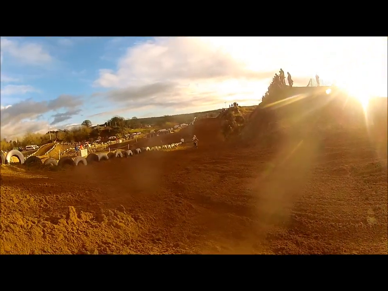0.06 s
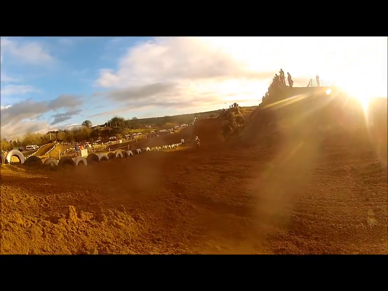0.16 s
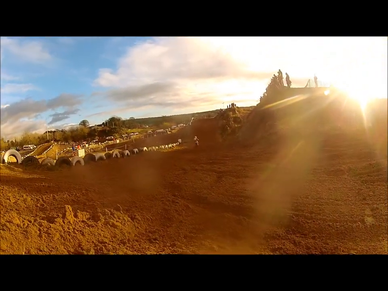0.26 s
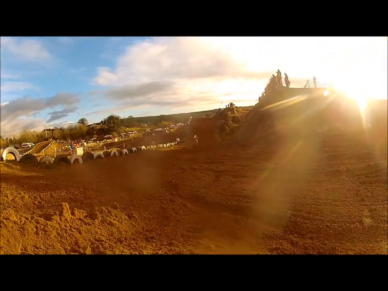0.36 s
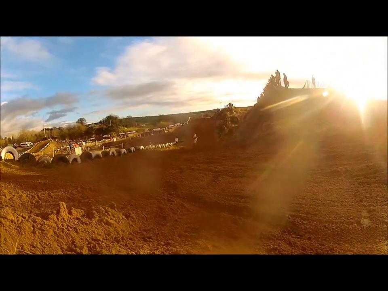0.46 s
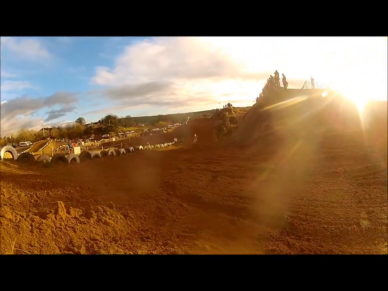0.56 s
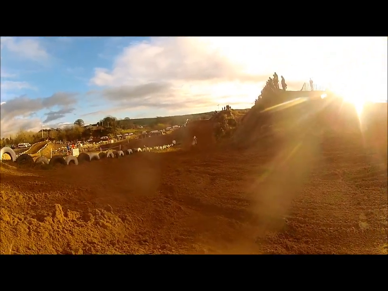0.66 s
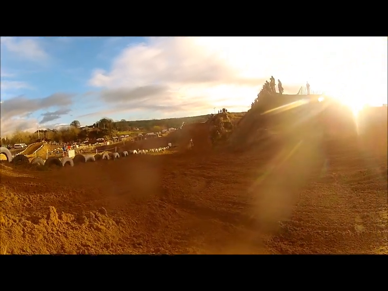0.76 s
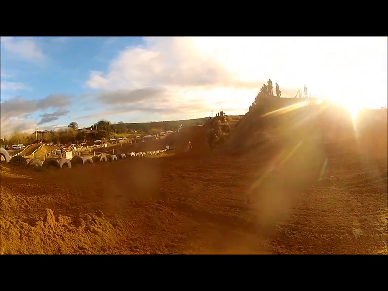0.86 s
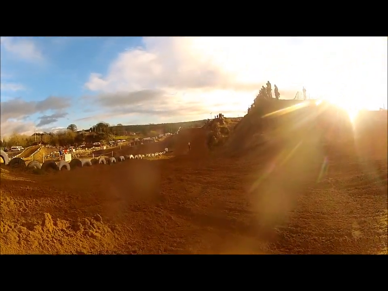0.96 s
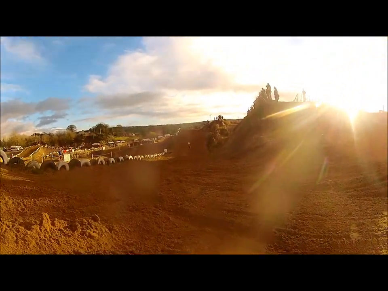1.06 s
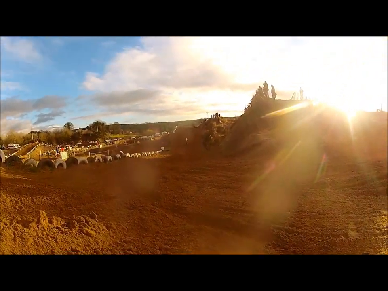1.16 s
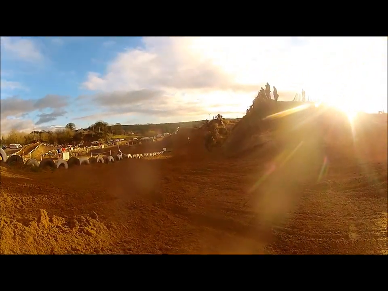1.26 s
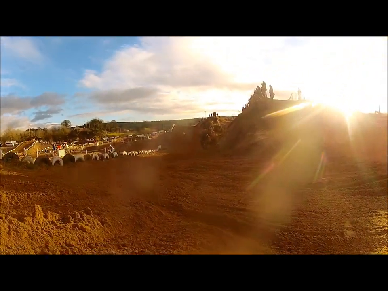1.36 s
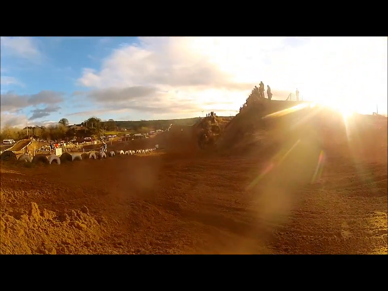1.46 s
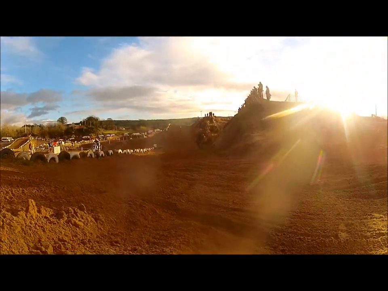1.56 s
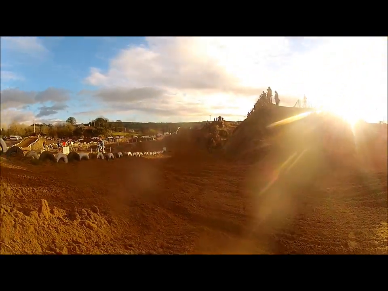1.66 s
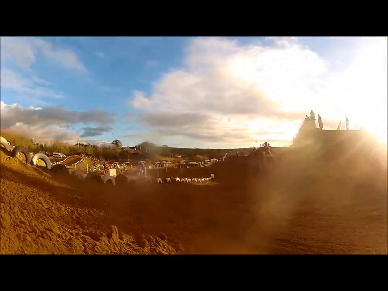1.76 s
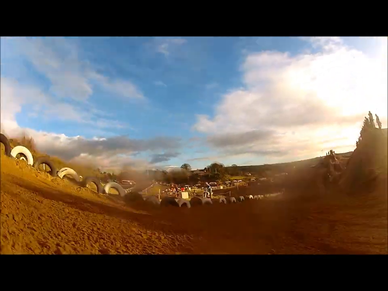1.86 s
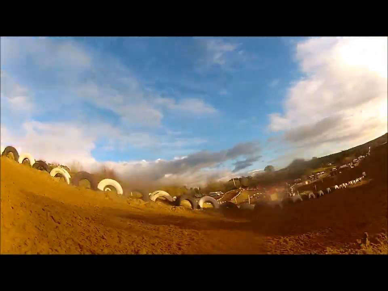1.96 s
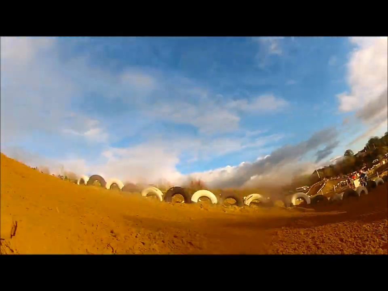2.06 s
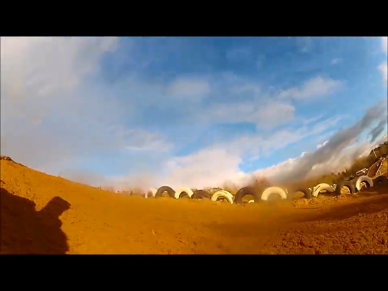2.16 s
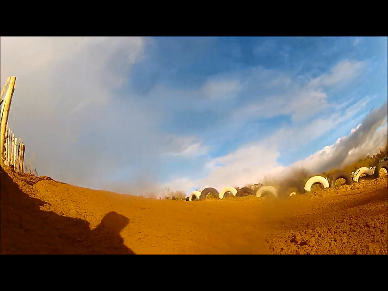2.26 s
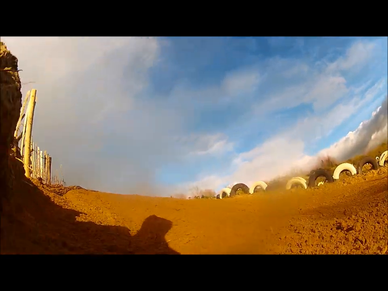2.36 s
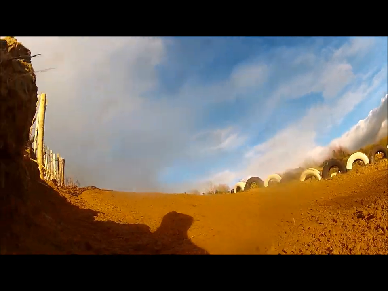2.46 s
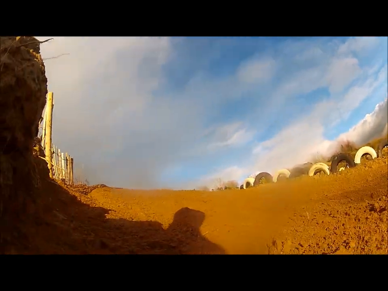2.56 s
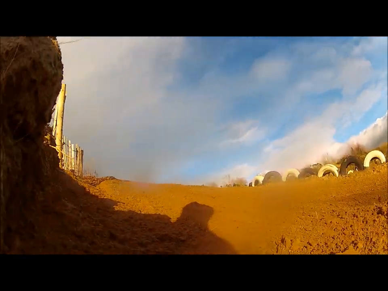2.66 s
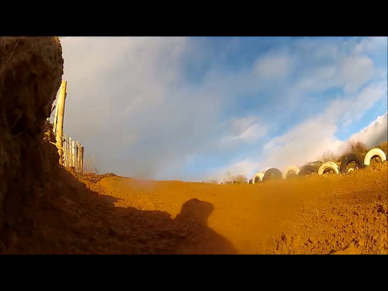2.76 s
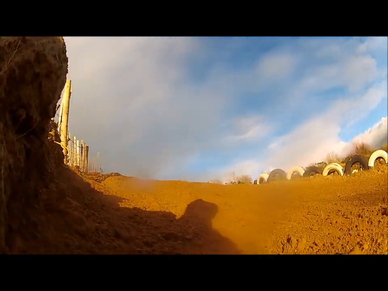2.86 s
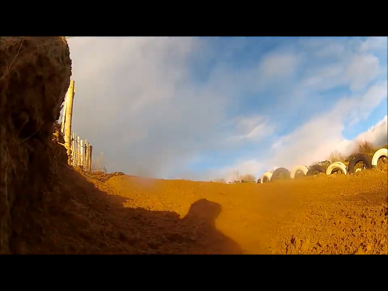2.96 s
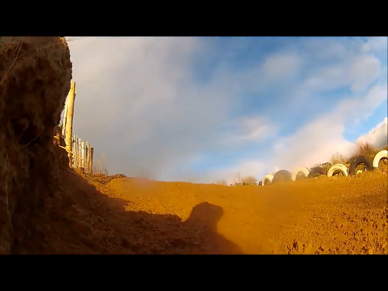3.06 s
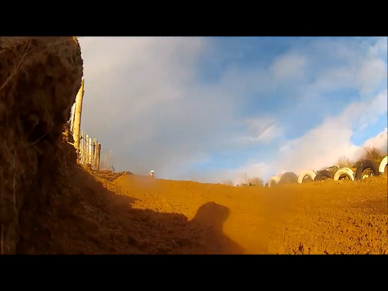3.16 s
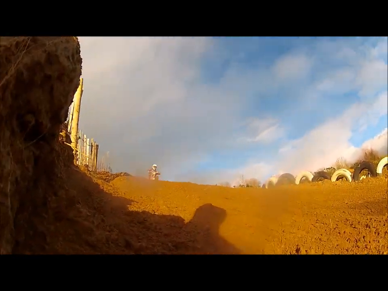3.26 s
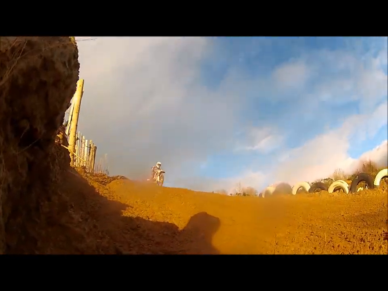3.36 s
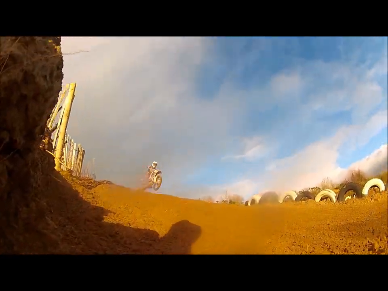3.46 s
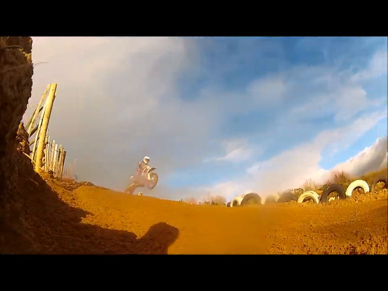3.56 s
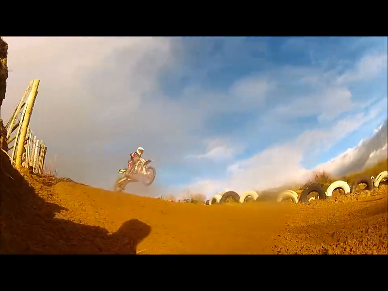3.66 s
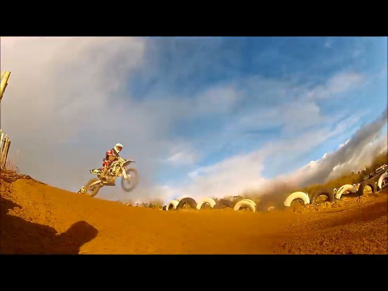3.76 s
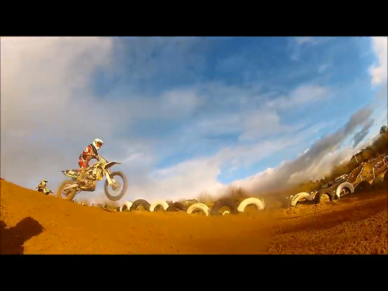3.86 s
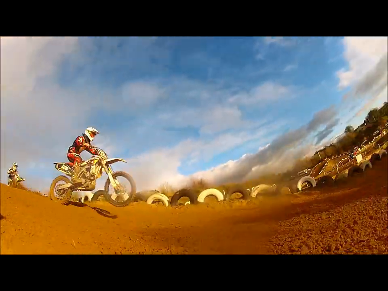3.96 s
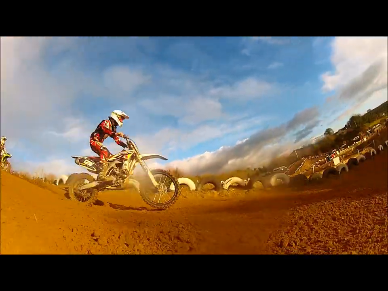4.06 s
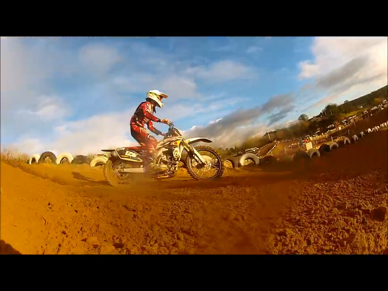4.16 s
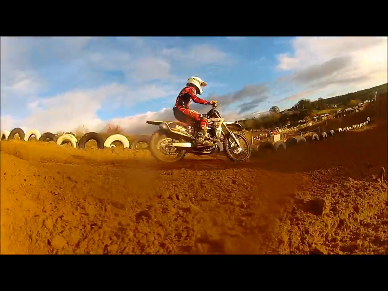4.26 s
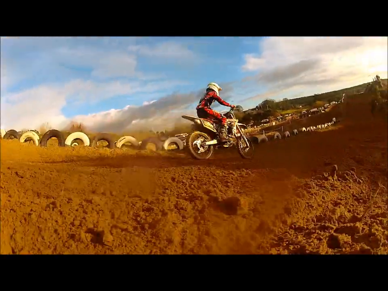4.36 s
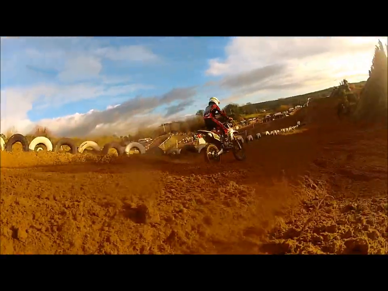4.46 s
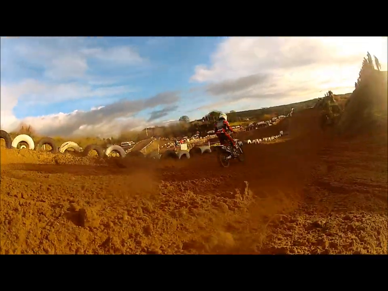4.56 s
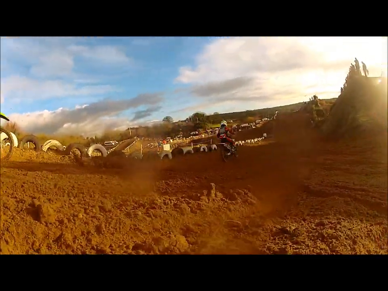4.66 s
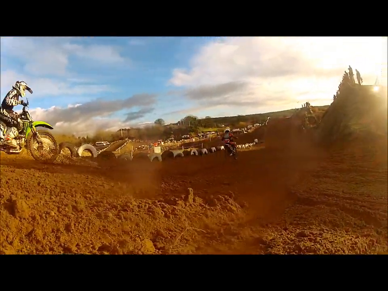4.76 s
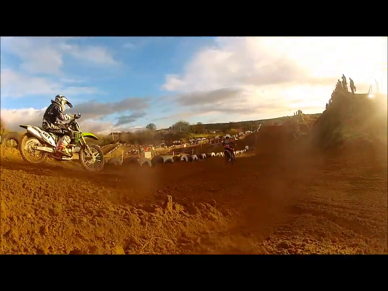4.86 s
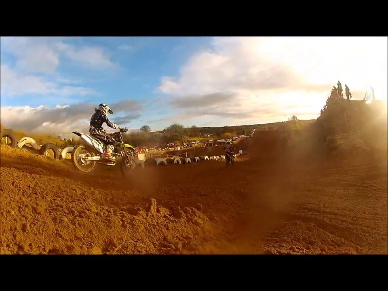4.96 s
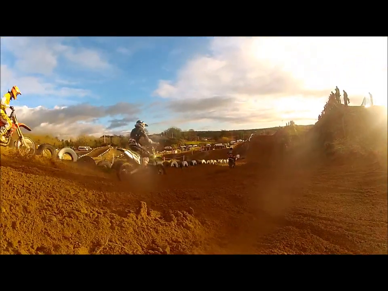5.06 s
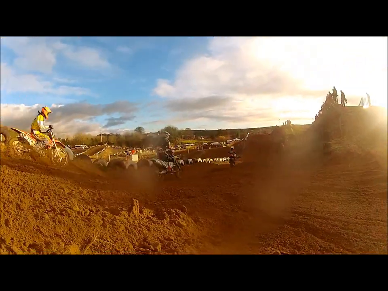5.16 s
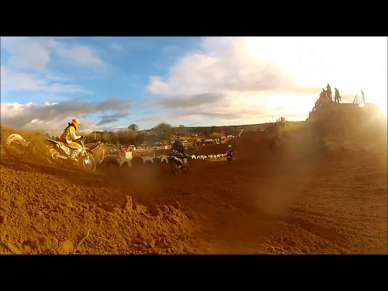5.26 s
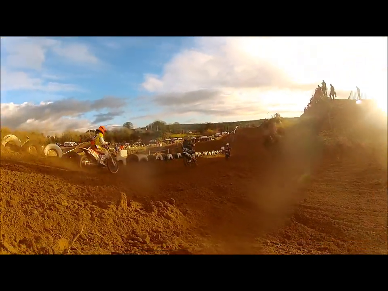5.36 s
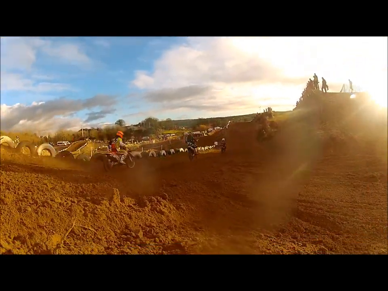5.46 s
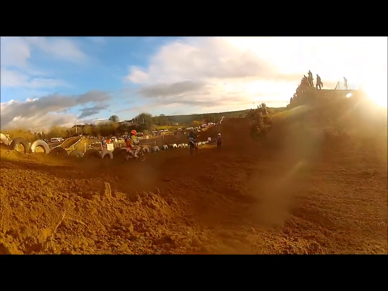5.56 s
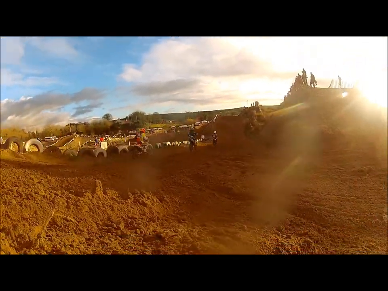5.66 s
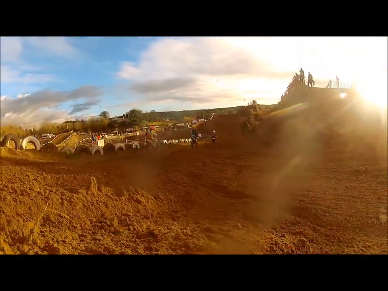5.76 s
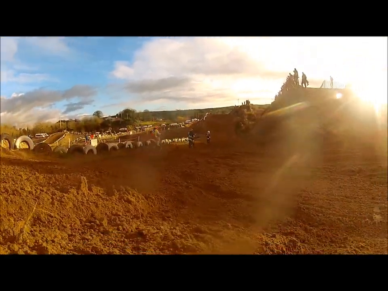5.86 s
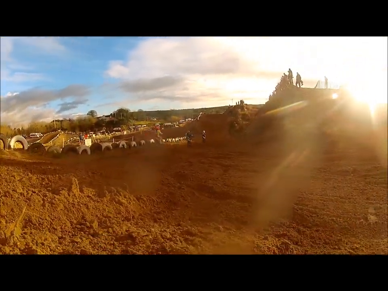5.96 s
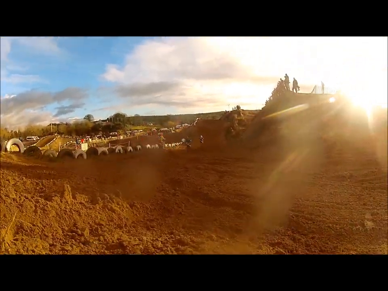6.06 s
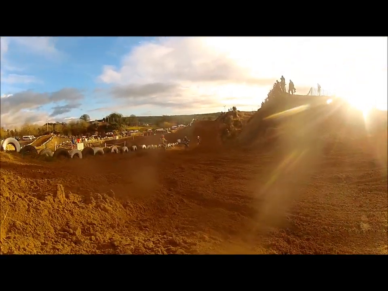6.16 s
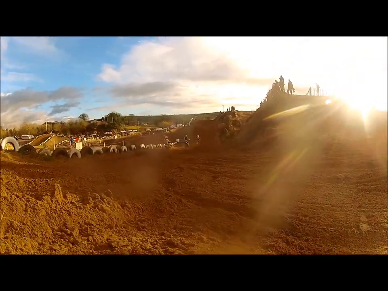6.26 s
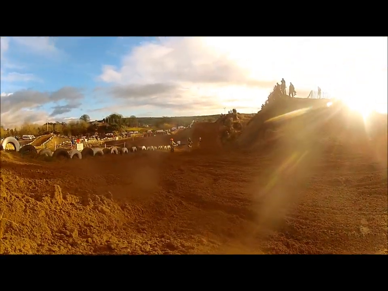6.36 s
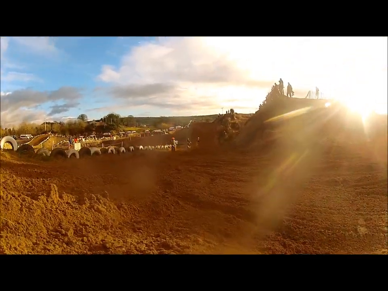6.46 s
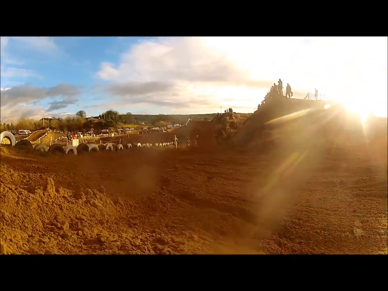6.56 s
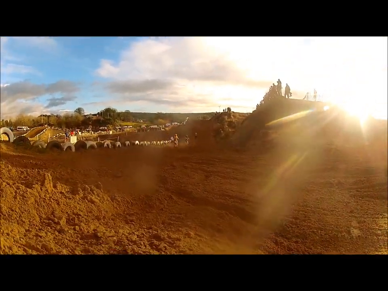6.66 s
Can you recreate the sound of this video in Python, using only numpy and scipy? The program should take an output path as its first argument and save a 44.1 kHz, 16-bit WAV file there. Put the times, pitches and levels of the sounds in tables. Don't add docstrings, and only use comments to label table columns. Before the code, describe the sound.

A bike already leaving fades under a lumpy distant pack of engines. Faint throttle blips and overrun pops dot a quieter lull. Revs climb behind a crest, then one dirt bike bursts past, followed at once by a second and a third, overlapping in a loud ragged blare of low thumps and sharp cracks. They move off with uneven throttle. Short earth-bank echoes, close enclosed camera microphone, coarse treble.

```python
import sys
import numpy as np
from scipy import signal
from scipy.fft import rfft, irfft
from scipy.io import wavfile
from scipy.ndimage import uniform_filter1d

SR = 44100
rng = np.random.default_rng(int(sys.argv[2]) if len(sys.argv) > 2 else 0)


def attenuation_scalar(level_db):
    decades = np.asarray(level_db, float) / 20
    return 10 ** decades


def generate_wav(signal):
    frames = np.transpose(np.atleast_2d(signal))
    scaled = np.clip(frames, -1, 1) * 32767
    pcm = np.round(scaled).astype(np.int16)
    wavfile.write(sys.argv[1], SR, pcm)


N = 295470

# order_hz, level_db
COMING = [(40, -17), (75, -6), (108, -4.5), (140, 5), (209, -5), (270, 2), (345, 0), (420, -6.5),
          (560, -12), (700, -16), (900, -19), (1300, -14)]
# order_hz, level_db
GOING = [(40, -18), (70, -7), (100, 1), (190, 2.5), (295, 4.5), (340, -12.5), (410, -18.5), (490, -24),
         (600, -19), (800, -19), (1100, -11), (1500, -35)]
# order_hz, level_db
BEYOND = [(35, -22), (65, -2.5), (125, 13.5), (170, -13), (220, 2.5), (310, -11), (350, -44), (440, -24.5),
          (600, -11), (800, -22), (1000, 0), (1400, -52.5)]
# freq_hz, level_db (per Hz)
HOUSING = [(350, -50), (600, -17.5), (833, -27), (962, -12.5), (1190, -9.5), (1320, -1), (1570, 2),
           (2060, -4), (2360, 5.5), (3000, -10), (3670, 7.5), (3930, -1.5), (4160, -12.5), (4630, -5.5),
           (6000, -21.5), (7800, -56), (13200, -120)]

BLUR_TURNS, FAR_BLUR_TURNS = 0.012, 0.07
PUSH_LATE_S = 0.0007
KNOCK_WIDTH_S = 0.00004
SPLIT_HZ = 2900


def bike(rows, passes_s, going, crack_db, rasp_db, hard=(), blur=BLUR_TURNS, air_db=3.5, burst_s=0.0009,
         coming=COMING, slap_s=0.0052, slap_db=-15.5, same=0.9, ground_ms=(1.1, 0.6), side_on=False):
    # freq_hz, change_db
    dulled_change = [(3700, 4.3), (4300, 5.5), (5000, -1), (6000, -4.5)]
    # freq_hz, change_db
    side_change = [(3000, 10), (3700, -10), (4400, 3), (5200, 5), (6000, -5)]
    # freq_hz, change_db
    hollow_change = [(700, 11.5), (1000, 13), (1300, 2), (1600, 2.5), (2000, 6), (2400, -4), (3000, 3.5)]
    inertia_s, pass_s, settle_s = 0.027, 0.093, 0.06
    rasp_follows, rasp_gone_db = 0.97, 2

    s, *columns = np.transpose(rows)
    t = np.arange(s[0], s[-1], 1 / SR)
    hz, thump_db, throttle_db = (np.interp(t, s, c) for c in columns)
    hz = uniform_filter1d(hz, round(inertia_s * SR), mode="nearest")
    gone = np.clip((t - passes_s) / pass_s, 0, 1)
    crack_db = thump_db + throttle_db + crack_db
    rasp_db = thump_db + rasp_follows * throttle_db + rasp_db

    turns = np.cumsum(hz * (1 + 0.004 * slow(len(t), 30))) / SR
    strength_db = 0.5 * np.minimum(rng.standard_normal((400, 2)), 1.3)
    uneven = np.zeros(len(t))
    if len(hard):
        turns, uneven = pin_to_hard(t, turns, strength_db, hard)
    cycle = np.floor(turns).astype(int)
    age_s = (turns - cycle) / hz

    puff, slow_puff = exhaust_puffs(age_s, burst_s, same)
    high = signal.butter(3, SPLIT_HZ, "high", fs=SR, output="sos")
    low = signal.butter(3, SPLIT_HZ, fs=SR, output="sos")
    crack = steady(signal.sosfilt(high, colour(puff, HOUSING)), cycle, strength_db[cycle, 0])
    crack = crack + attenuation_scalar(slap_db) * np.roll(crack, round(slap_s * SR))
    rasp = steady(signal.sosfilt(low, colour(slow_puff, HOUSING)), cycle, strength_db[cycle, 1])
    if going is BEYOND:
        rasp = evened(colour(rasp, hollow_change))
        crack = evened(colour(crack, side_change if side_on else dulled_change))
    rasp = ground(rasp, np.linspace(*ground_ms, len(t))) * attenuation_scalar(rasp_gone_db * gone)

    settled = uniform_filter1d(uneven, round(settle_s * SR), mode="nearest")
    even = turns + uneven - settled - hz * PUSH_LATE_S
    low_part = attenuation_scalar(thump_db + 0.8 * slow(len(t), 20)) * thump(even, hz, gone, coming, going, blur, air_db)
    high_part = attenuation_scalar(crack_db) * crack + attenuation_scalar(rasp_db) * rasp
    fade = signal.windows.tukey(len(t), 0.0028 / (s[-1] - s[0]))
    return round(s[0] * SR), fade * np.array([low_part, high_part])


def pin_to_hard(t, turns, strength_db, hard):
    at, over_db = np.transpose(hard)
    at = at - PUSH_LATE_S
    uneven = np.interp(t, at, np.unwrap(np.interp(at, t, turns) % 1, period=1))
    turns = turns - uneven
    hit = np.round(np.interp(at, t, turns)).astype(int)
    strength_db[hit] = over_db[:, None] * [1, 0.45]
    return turns, uneven


def exhaust_puffs(age_s, burst_s, same):
    alike = rng.standard_normal(SR // 10)[(age_s * SR).astype(int)]
    jet = same * alike + rng.standard_normal(len(age_s))
    rise = (1 - np.exp(-age_s / 0.001)) ** 2
    puff = rise * np.exp(-age_s / burst_s) * jet
    knock = 2.2 * np.exp(-0.5 * ((age_s - 0.0017) / KNOCK_WIDTH_S) ** 2)
    slow_puff = (age_s / burst_s) ** 2 * np.exp(-age_s / (1.49 * burst_s)) * jet + knock
    return puff, slow_puff


def thump(turns, hz, gone, coming, going, blur, air_db):
    lead_turns, lag_turns, coming_hz, going_hz = 0.25, 0.95, 220, 150
    k = np.arange(1, 15)[:, None]
    steps = len(hz) // 50 + 9

    def wander(rate_hz):
        return np.array([np.repeat(slow(steps, 50 * rate_hz), 50)[:len(hz)] for _ in k])

    waver_db = 1.7 * wander(6)
    drift = uniform_filter1d(wander(12), 50)
    order_hz = k * hz
    view_db = (1 - gone) * read(coming, order_hz) + gone * read(going, order_hz)
    gain = attenuation_scalar(0.5 * read(COMING, order_hz) + view_db + waver_db - air_db * order_hz / 1000)
    gain /= np.sqrt((gain ** 2).sum(0) / 2)
    turned_away = gone if coming is COMING else 1
    corner_hz = coming_hz + (going_hz - coming_hz) * turned_away
    lag = lag_turns * np.tanh(order_hz / corner_hz) - lead_turns
    return (gain * np.cos(2 * np.pi * (k * turns - lag + blur * np.sqrt(k) * drift))).sum(0)


def steady(x, cycle, strength_db):
    step = cycle - cycle[0]
    energy = np.bincount(step, x ** 2) + 1e-20
    return evened(x * attenuation_scalar(strength_db) / np.sqrt(energy[step] + 0.1 * energy.mean()))


def ground(x, delay_ms):
    at = np.arange(len(x))
    return evened(x + attenuation_scalar(-17.5) * np.interp(at - delay_ms * SR / 1000, at, x))


def third_bike():
    # start_s, firing_hz, level_db, throttle_db
    coming_rows = [(4.775, 74, -31, -4), (4.83, 78, -28, -6), (4.9, 105, -24, -1), (4.95, 108, -22, -6),
                   (4.99, 107, -33, -1), (5.07, 103, -30, -5), (5.125, 86, -18.5, -9),
                   (5.19, 81.5, -18.5, -4), (5.248, 77, -19.5, -4.5), (5.322, 67.2, -21, -0.5)]
    # start_s, firing_hz, level_db, throttle_db
    bump_rows = [(5.453, 85.6, -22, -4), (5.505, 84.2, -25.5, 4.5), (5.565, 69, -22.5, 8),
                 (5.601, 79.9, -28, 3), (5.65, 68.4, -21, -3), (5.704, 84.8, -26, 1.5),
                 (5.811, 81, -23, -2)]
    # start_s, firing_hz, level_db, throttle_db
    going_rows = [(5.922, 100.9, -19.5, -5.5), (5.985, 83.7, -23, 0), (6.127, 96.9, -21, -4.5),
                  (6.266, 100.3, -25, -3), (6.348, 85.8, -27, -3), (6.374, 91.1, -21.5, -7.5),
                  (6.504, 80.4, -30.5, -2), (6.7, 99.5, -26.5, -6.5)]
    # start_s, over_db
    hard_rows = [(4.8758, 5), (4.8937, 5), (4.903, 3), (5.1566, 5.5), (5.1814, 4.5), (5.2405, 9),
                 (5.2915, 6.5), (5.324, 6), (5.3527, 7.5), (5.4052, 5.5), (5.4174, 8.5), (5.4298, 10),
                 (5.442, 3), (5.478, 8.5), (5.491, -5), (5.5022, 2), (5.5165, -7), (5.528, -2.5),
                 (5.5554, -4), (5.5823, 1.5), (5.6087, 10.5), (5.6363, 0), (5.6646, 0), (5.6783, 5.5),
                 (5.7035, -3), (5.7295, -1), (5.7685, 4.5), (5.78, 1), (5.7932, 4), (5.8312, 2.5),
                 (5.843, 1), (5.855, -3), (5.8985, 0), (5.93, -1), (5.9505, 3), (5.9622, -2), (5.985, 0),
                 (5.9965, 0.5), (6.042, 0.5), (6.0734, 5), (6.084, -7), (6.1146, 4), (6.1956, 4),
                 (6.257, 1), (6.3192, 6.5), (6.3427, 3), (6.353, 6), (6.397, -3), (6.4465, 3.5), (6.496, 6),
                 (6.5085, 8.5), (6.5335, 7), (6.5455, 1), (6.5805, 5), (6.656, 1)]
    # start_s, over_db
    more_hard_rows = [(4.7977, 7), (4.8134, 8), (4.826, -1), (4.8631, 2), (4.8848, 3), (5.168, -4),
                      (5.194, -2), (5.3099, 3), (5.5416, -7), (5.5699, -2.5), (5.5951, 4), (5.6221, 3),
                      (5.6505, 4.5), (6.0191, 0), (6.104, -3), (6.145, 3), (6.175, 3), (6.205, 3.5),
                      (6.2453, 3), (6.4573, -6), (6.558, 1), (6.592, 0), (6.6059, -3), (6.6451, -1),
                      (6.666, -1)]
    return [bike(coming_rows + bump_rows + going_rows, 5.68, GOING, crack_db=-0.54, rasp_db=-5.5,
                 hard=sorted(hard_rows + more_hard_rows))]


def second_bike():
    # start_s, firing_hz, level_db, throttle_db
    coming_rows = [
        (4.52, 74.3, -22, -15),
        (4.65, 94.6, -21.5, -5),
        (4.708, 85.1, -23, -5.5),
        (4.82, 54.2, -21.5, -6),
        (4.932, 51.8, -22.5, 0.5),
    ]
    # start_s, firing_hz, level_db, throttle_db
    going_rows = [(4.96, 54, -20, -6), (5.03, 66.5, -19, -7), (5.09, 76, -20, -7), (5.16, 63, -30, 3),
                  (5.23, 62, -30, 7), (5.308, 59.6, -25, -17), (5.58, 71.1, -37.5, -32)]
    # start_s, over_db
    hard_rows = [(4.6495, 0), (4.6606, -3), (4.7047, 8.5), (4.7186, 5), (4.742, 7), (4.755, 6),
                 (4.7715, 6.5), (4.7867, 1), (4.839, 5), (4.8758, 3), (4.915, -2), (4.934, -6), (4.952, -1),
                 (4.9703, 1), (5.0189, -4), (5.0338, 3), (5.0487, 7.5), (5.0625, 5), (5.0762, -9),
                 (5.102, 6.5), (5.2085, 1.5), (5.2245, -1.5), (5.2405, 0), (5.2555, 5)]
    return [bike(coming_rows + going_rows, 5.6, GOING, crack_db=1.2, rasp_db=-2.5, hard=hard_rows,
                 blur=2 * BLUR_TURNS)]


def first_bike():
    # start_s, firing_hz, level_db, throttle_db
    engine_rows = [(3.84, 43.87, -47, 0.5), (4.032, 69.7, -28.5, -6.5), (4.132, 78.64, -23.5, -6.5),
                   (4.218, 67.64, -21.5, -6.5), (4.31, 64.5, -20, -1), (4.426, 87.2, -19.5, -4.5),
                   (4.49, 92, -20, -4), (4.594, 81.65, -25, -2), (4.78, 61.6, -28, -12)]
    # start_s, over_db
    hard_rows = [(4.0144, 8), (4.0712, -11), (4.138, 3), (4.1783, 2), (4.2064, -6), (4.221, 3),
                 (4.237, 3.5), (4.2657, 3), (4.3105, -3.5), (4.3238, 4.5), (4.352, -7), (4.3652, 1.5),
                 (4.3786, 2), (4.3913, 0), (4.4036, 1.5), (4.415, 3.5), (4.439, 6.5), (4.493, 2),
                 (4.5044, 4.5), (4.5156, 6), (4.5375, 4), (4.548, 5.5), (4.572, 5.5), (4.584, 6.5)]
    return [bike(engine_rows, 4.8, GOING, crack_db=0.8, rasp_db=-7, hard=hard_rows)]


def leaving_bike():
    # start_s, firing_hz, level_db, throttle_db
    engine_rows = [(0.0, 61.6, -29, -2), (0.238, 75.2, -32, -4), (0.265, 73.8, -32, -3),
                   (0.3, 69.3, -34, -6), (0.345, 56.5, -35.5, -6), (0.52, 61.9, -34, -8),
                   (0.562, 59.4, -33, -2), (0.77, 78, -36.5, -4), (0.804, 79.3, -43, -2),
                   (0.85, 77.5, -74, 12)]
    # start_s, over_db
    hard_rows = [(0.0095, -2.5), (0.0245, 4), (0.056, 2), (0.0862, 2.5), (0.101, 3), (0.1313, -6),
                 (0.1587, -5), (0.172, -2), (0.2126, -1), (0.239, 1), (0.2795, 5), (0.344, 9), (0.394, 11),
                 (0.4114, 10.5), (0.445, 4.5), (0.4957, 7), (0.53, 5.5), (0.5465, 7.5), (0.578, -2),
                 (0.593, 1), (0.6094, 4), (0.6245, -3), (0.6546, 3.5), (0.6971, -4), (0.7242, -2),
                 (0.7506, -7)]
    # order_hz, level_db
    open_orders = [(35, -26), (65, -1.5), (120, 20.5), (150, -8), (185, 7), (225, 12.5), (290, -1.5),
                   (350, -19), (600, -12), (1000, -6), (1400, -52)]
    return [bike(engine_rows, 0.46, BEYOND, crack_db=1, rasp_db=-9, hard=hard_rows, coming=open_orders,
                 slap_s=0.0063, slap_db=-11.5, same=1.5)]


def distant_bikes():
    # start_s, firing_hz, level_db, throttle_db
    coast_rows = [
        (0.89, 59.8, -66, 9),
        (0.924, 60.65, -39, -11.5),
        (1.052, 56.66, -40.5, -10),
        (1.09, 55.1, -44, -14.5),
        (1.17, 54, -47, -14),
        (1.19, 54, -58, -28),
    ]
    # start_s, firing_hz, level_db, throttle_db
    cruise_rows = [(1.15, 49.7, -60, -26), (1.2, 49.5, -46, -25), (1.544, 48.94, -42, -16),
                   (1.62, 48, -39.5, -32), (1.7, 44.7, -39, -22), (1.78, 41.6, -40, -20),
                   (1.87, 40.86, -53, -20)]
    # start_s, firing_hz, level_db, throttle_db
    pull_rows = [
        (1.6, 45, -59, -4),
        (1.784, 47.4, -45, -4),
        (1.886, 50.7, -43, -8.5),
        (1.944, 57.3, -42, 0),
        (1.958, 54, -64, -27),
    ]
    # start_s, over_db
    hard_rows = [(1.682, -3), (1.7037, 0), (1.7235, -1), (1.7449, -3), (1.7669, 2), (1.7875, 0),
                 (1.8083, 2), (1.829, 3), (1.8495, 4), (1.8695, 9), (1.8887, 9), (1.908, 5.5), (1.9255, -2),
                 (1.9447, 9)]
    # order_hz, level_db
    shut_orders = [(35, -27), (60, -1), (100, 5), (125, 5), (155, -9), (190, -19), (290, -15.5), (340, -34),
                   (600, -20)]
    # order_hz, level_db
    even_orders = [(40, -22), (95, 2), (140, 14), (200, -31), (290, -7.5), (340, -31), (600, -26)]
    return [bike(coast_rows, 0, shut_orders, crack_db=-3, rasp_db=1.5),
            bike(cruise_rows, 0, even_orders, crack_db=-10, rasp_db=0),
            bike(pull_rows, 0, BEYOND, crack_db=-8, rasp_db=0.5, hard=hard_rows, burst_s=0.0012,
                 ground_ms=(1.6, 0.6), side_on=True)]


def hill_bike():
    # start_s, firing_hz, level_db, throttle_db
    rise_rows = [
        (2.22, 56, -81, -7),
        (2.356, 72.3, -40, -14),
        (2.432, 78, -53.5, 1),
        (2.48, 83.8, -61, 15),
    ]
    # start_s, firing_hz, level_db, throttle_db
    blip_rows = [
        (2.5, 68.4, -52, -22),
        (2.556, 60, -42.5, -5),
        (2.602, 52.2, -45.5, 2),
        (2.672, 46, -53, -1),
        (2.72, 43.2, -62, 1),
    ]
    # start_s, firing_hz, level_db, throttle_db
    second_rows = [
        (3.172, 52.8, -58, 0),
        (3.2, 53.9, -45, 4),
        (3.228, 55.9, -46.5, 2),
        (3.262, 54.7, -49, -10),
    ]
    # start_s, firing_hz, level_db, throttle_db
    climb_rows = [(3.45, 60.83, -47.5, -1.5), (3.648, 89.9, -37, -6), (3.72, 91.04, -33.5, -12.5),
                  (3.81, 72.9, -39, -8), (3.898, 98.1, -33.5, -16), (3.96, 104.6, -34, -16),
                  (4.034, 90.1, -31, -15), (4.08, 88.55, -24, 5.5)]
    # start_s, over_db
    hard_blip_rows = [(2.56, 6.5), (2.5785, 3), (2.596, 3), (2.6155, 2), (2.636, 2.2), (2.658, 4)]
    # start_s, over_db
    hard_second_rows = [(3.186, 7), (3.2047, 7), (3.2225, 5), (3.241, -8)]
    return [bike(rise_rows, 7, GOING, crack_db=-19, rasp_db=0.5, blur=FAR_BLUR_TURNS),
            bike(blip_rows, 7, GOING, crack_db=1.5, rasp_db=-7, hard=hard_blip_rows, coming=BEYOND),
            bike(second_rows, 7, GOING, crack_db=-3, rasp_db=-4, hard=hard_second_rows),
            bike(climb_rows, 7, GOING, crack_db=-14, rasp_db=-3.5, blur=FAR_BLUR_TURNS, air_db=12)]


def trailing_bike():
    # start_s, firing_hz, level_db, throttle_db
    engine_rows = [
        (5.9, 87.3, -36, 9.5),
        (5.932, 84.4, -32, -21),
        (6.058, 65.2, -32, 2.5),
        (6.34, 59.8, -37, -27),
        (6.7, 69, -70, 8),
    ]
    return [bike(engine_rows, 0, BEYOND, crack_db=-6, rasp_db=-4.5)]


def pops():
    # start_s, level_db, dull_db
    pop_rows = [(2.704, -49, -5), (2.7746, -55, -6), (2.803, -56, -10), (2.83, -60, -10), (2.909, -60, 4),
                (2.9297, -54, -5), (2.9515, -55, -1), (2.973, -58, -5), (2.9941, -54, -12),
                (3.016, -60, -7), (3.038, -49.5, -21), (3.0609, -57, -8), (3.086, -54, -12),
                (3.109, -52, -11), (3.1213, -48, -10), (3.134, -52, -6), (3.144, -45, -9),
                (3.1575, -53, -13), (3.1652, -47, -7), (3.2849, -55, -2), (3.307, -50, -4),
                (3.3543, -66, 3), (3.3757, -60, 7), (3.3967, -63, 5), (3.4181, -62, 7), (3.4396, -62, 9),
                (4.9844, -22.5, 0), (4.9969, -29, 0), (5.269, -22, -2), (5.282, -24.5, -3),
                (5.3881, -25, 1), (5.4225, -32, 5)]
    pop_s, push_db, push_hz = 0.000472, -12, 187
    age_s = np.arange(500) / SR
    shape = (age_s / pop_s) ** 2 * np.exp(-age_s / pop_s)
    knock = 0.39 * np.exp(-0.5 * ((age_s - pop_s) / KNOCK_WIDTH_S) ** 2)
    push = -attenuation_scalar(push_db) * np.hanning(len(age_s)) * np.sin(2 * np.pi * push_hz * age_s)
    low = signal.butter(3, SPLIT_HZ, fs=SR, output="sos")
    out = np.zeros(N)
    for s, db, dull_db in pop_rows:
        burst = colour(shape * rng.standard_normal(len(age_s)) + knock, HOUSING)
        dull = signal.sosfiltfilt(low, burst)
        pop = evened(burst - dull) + attenuation_scalar(dull_db) * evened(dull) + push
        out[round(s * SR):][:len(age_s)] += attenuation_scalar(db) * pop
    return out


def face_down_track(x):
    # freq_hz, change_db
    track_change = [(700, 0.1), (1050, 1), (1500, -8), (1950, 0), (2330, 0.6), (2900, -13), (3600, 0),
                    (6000, -4)]
    # time_s, share (0-1)
    facing_share = [(5.2, 0.038), (5.6, 0.55)]
    down = np.clip(np.interp(np.arange(N) / SR, *np.transpose(facing_share)), 0, 1)
    return (1 - down) * x + down * colour(x, track_change)


def banks(x):
    t60_s = 0.24
    t = np.arange(SR // 2) / SR
    sparse = rng.standard_normal(len(t)) * (rng.random(len(t)) < 0.05)
    taps = sparse * attenuation_scalar(-60 * t / t60_s) * (t > 0.004)
    return signal.oaconvolve(x, taps / np.linalg.norm(taps))[:N]


def pack():
    # time_s, level_db
    pack_level = [(0, -41), (.8, -41.5), (1.1, -45), (1.4, -46), (1.7, -42.5), (1.9, -42.5), (2.3, -40),
                  (2.6, -38.5), (3, -39.5), (3.4, -39), (3.8, -34.5), (4.5, -30.5), (4.9, -25.5),
                  (5.3, -28), (5.8, -28.5), (6.7, -34.5)]
    # centre_s, half_s, level_db
    roar_rows = [(0, 0.26, -45), (1.767, 0.027, -72), (1.925, 0.018, -59), (2.31, 0.22, -56.5),
                 (2.826, .13, -64.5), (4.11, .15, -30), (4.634, 0.069, -22.5), (4.976, 0.18, -23),
                 (5.292, 0.97, -35.5), (6.088, 0.63, -52)]
    # time_s, share (0-1)
    turned_share = [(1.95, 0), (2.3, 1), (3.6, 1), (4.2, 0)]
    # freq_hz, level_db (per Hz)
    drone_track = [(15, -93), (25, -59), (43, -13.5), (145, 5), (238, -2.5), (291, -9.5), (415, -23.5),
                   (844, -27.5), (1000, -16), (1300, -46), (2200, -120)]
    # freq_hz, level_db (per Hz)
    drone_hill = [(15, -75), (25, -22), (49, -6), (81, -7.5), (108, 0.5), (210, 0), (345, -9.5), (659, -33),
                  (1000, -36), (1300, -65), (2200, -120)]
    # freq_hz, level_db (per Hz)
    hiss_track = [(350, -1), (600, -29.5), (1180, -2), (1360, 6), (1590, 9.5), (1750, 0.5), (2310, 12),
                  (2860, 0), (3460, 12), (4160, -0.5), (4760, 1.5), (5140, -0.5), (6000, -13.5),
                  (7800, -76), (13200, -120)]
    # freq_hz, level_db (per Hz)
    hiss_hill = [(350, -34), (600, -32), (935, -5.5), (1160, -0.5), (1350, -14.5), (1650, 2.5),
                 (2040, -2.5), (2290, 8.5), (3330, -3.5), (3670, 10.5), (4810, -6.5), (5450, -3),
                 (6000, -28), (7800, -25), (13200, -120)]
    # time_s, delay_ms
    echo_delay = [(0, 0.69), (1.2, 0.65), (2, 0.75), (2.7, 0.54), (3.3, 0.7), (3.8, 0.55), (5, 0.75),
                  (6.7, 0.48)]

    t = np.arange(N) / SR
    loud = attenuation_scalar(np.interp(t, *np.transpose(pack_level)))
    roar = sum(attenuation_scalar(db) * np.exp(-((t - s) / half_s) ** 2) for s, half_s, db in roar_rows)
    turned = np.interp(t, *np.transpose(turned_share))

    far = np.zeros(N)
    for hz in (42.1, 56.4, 70.6, 82.75):
        turns = np.cumsum(hz * (1 + 0.13 * slow(N, 1.5))) / SR
        far += np.diff(turns.astype(int), prepend=0) * attenuation_scalar(3.05 * slow(N, 7.5))
    far = evened(far) + 0.5 * rng.standard_normal(N)
    drone = (1 - turned) * evened(colour(far, drone_track)) + turned * evened(colour(far, drone_hill))

    flutter = attenuation_scalar(1.65 * slow(N, 100)) * rng.standard_normal(N)
    hiss = (1 - turned) * evened(colour(flutter, hiss_track)) + turned * evened(colour(flutter, hiss_hill))
    hiss = ground(hiss, np.interp(t, *np.transpose(echo_delay)))
    hush_db = -4.5 * np.exp(-((t - 3.3) / 0.3) ** 2)
    hiss_gain = attenuation_scalar(-11 + hush_db) * np.minimum(loud, attenuation_scalar(-38.5)) + roar
    return loud * drone + hiss_gain * hiss


def rumble():
    return attenuation_scalar(-61) * slow(N, 45)


def evened(x):
    return x / np.sqrt(np.mean(x ** 2) + 1e-20)


def read(points, hz):
    f, db = np.transpose(points)
    return np.interp(np.log(hz + 1), np.log(f + 1), db)


def colour(x, points):
    hz = abs(np.fft.fftfreq(8192, 1 / SR))
    log_gain = np.log(attenuation_scalar(np.maximum(read(points, hz), -100)))
    taps = np.fft.ifft(np.exp(np.conj(signal.hilbert(log_gain)))).real[:4096]
    return signal.oaconvolve(x, taps / np.linalg.norm(taps))[:len(x)]


def slow(count, hz):
    return evened(signal.lfilter(*signal.butter(2, hz, fs=SR), rng.standard_normal(count)))


def scene():
    near = np.zeros((2, N))
    bikes = (third_bike() + second_bike() + first_bike() + leaving_bike() + distant_bikes()
             + hill_bike() + trailing_bike())
    for start, sound in bikes:
        near[:, start:start + sound.shape[1]] += sound[:, :N - start]
    near[1] = face_down_track(near[1] + pops())
    echoes = attenuation_scalar(-18) * banks(near[0]) + attenuation_scalar(-15) * banks(near[1])
    mono = near.sum(0) + echoes + pack() + rumble()
    return np.array([mono, mono])


def sample_and_hold(x):
    hold_hz = 12000
    hz = np.fft.rfftfreq(N, 1 / SR) + 1
    slope = irfft(rfft(x) * hz * (hz < hold_hz / 2), N)
    mirrored = slope * 2 * np.cos(2 * np.pi * hold_hz * np.arange(N) / SR)
    return x + attenuation_scalar(0.44) * irfft(rfft(mirrored) / hz, N)


def overload(x):
    over = np.maximum(abs(x[0]) - 0.46, 0)
    kick = signal.lfilter(*signal.butter(1, [8, 90], "band", fs=SR), uniform_filter1d(over, 90))
    return np.clip(x, -1, 1) + attenuation_scalar(6) * np.array([kick, -kick])


def band_edge(x):
    edge_hz = 15330
    hz = np.fft.rfftfreq(N, 1 / SR) + 1
    edge_db = np.interp(hz, [edge_hz, edge_hz + 80, edge_hz + 600, edge_hz + 1300], [0, -12, -33, -48])
    return irfft(rfft(x) * attenuation_scalar(edge_db), N)


def top_cut(x):
    return signal.sosfilt(signal.butter(12, 16680, fs=SR, output="sos"), x)


def record(dry):
    mix = band_edge(overload(sample_and_hold(dry)))
    return top_cut(mix)


dry = scene()
out = record(dry)
generate_wav(out)
```